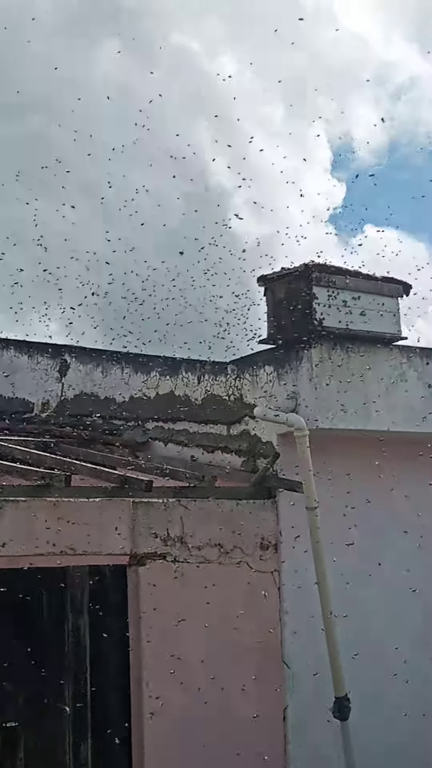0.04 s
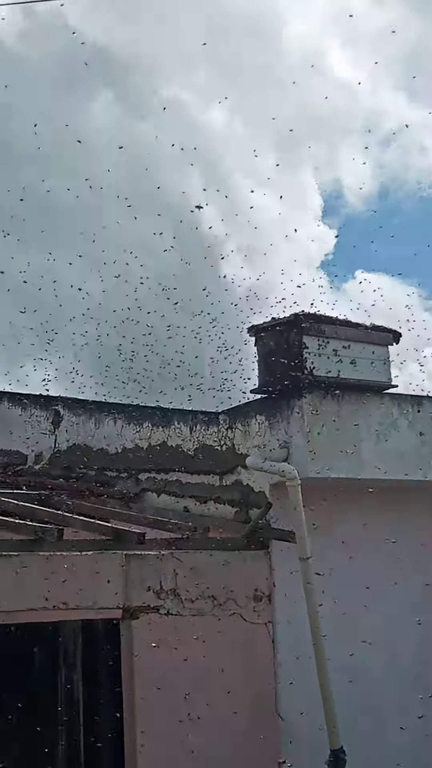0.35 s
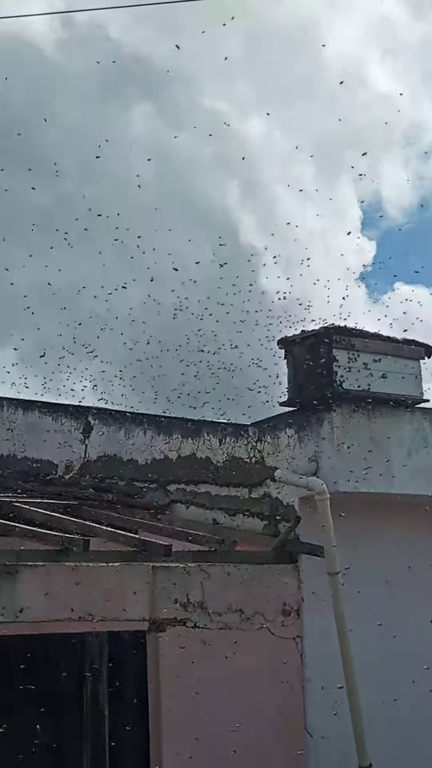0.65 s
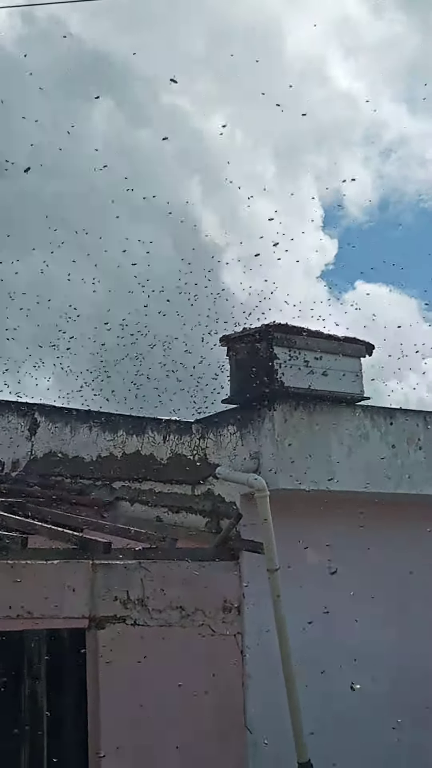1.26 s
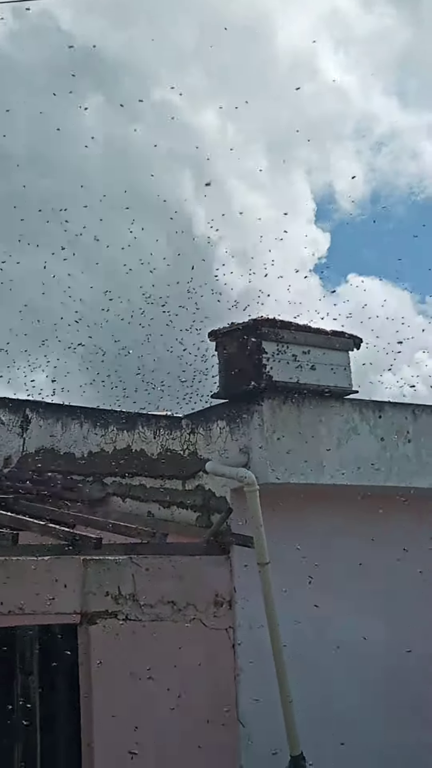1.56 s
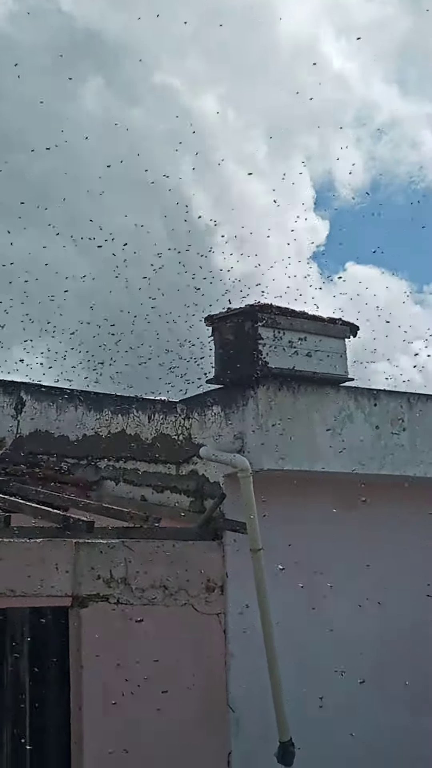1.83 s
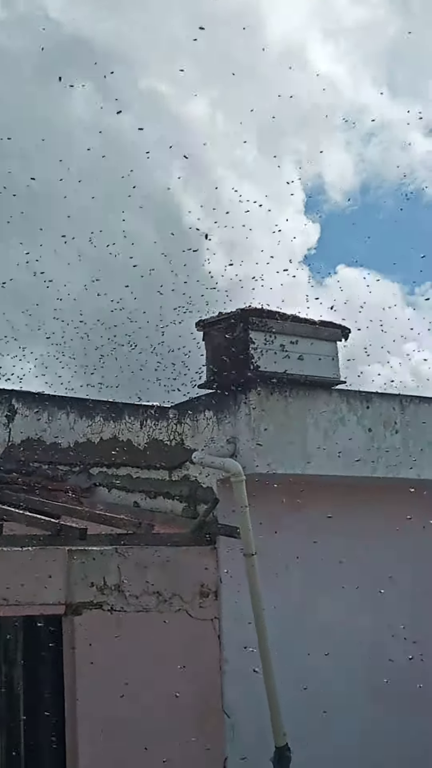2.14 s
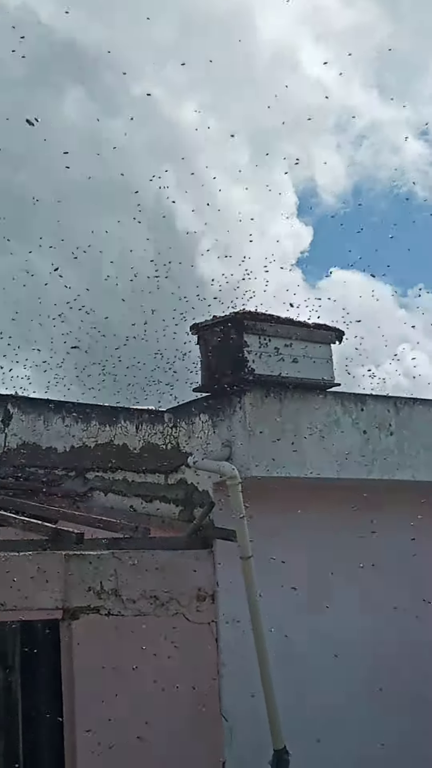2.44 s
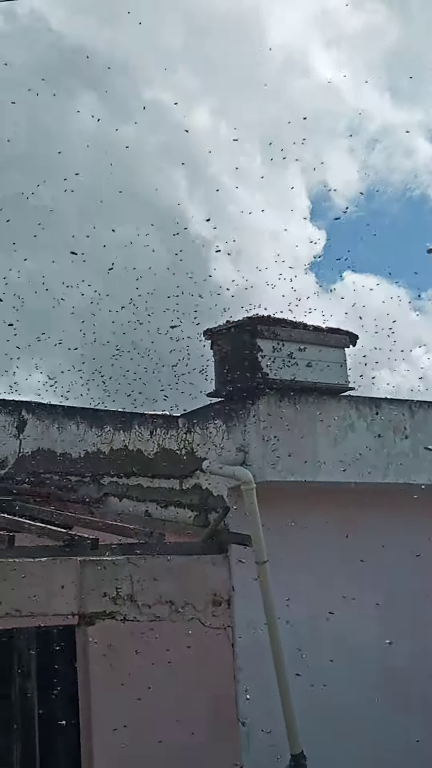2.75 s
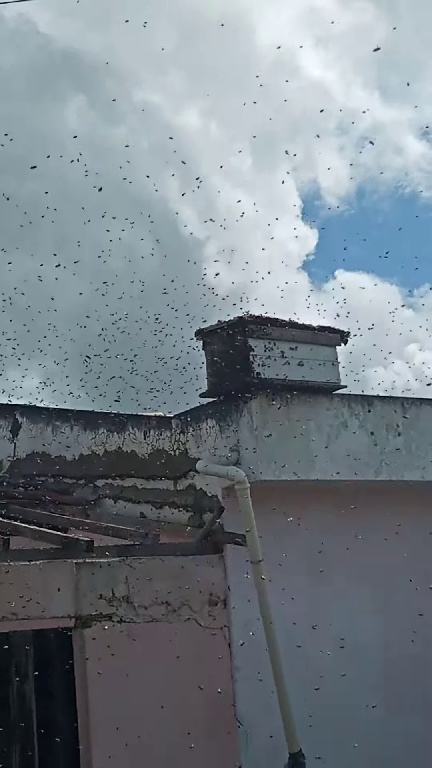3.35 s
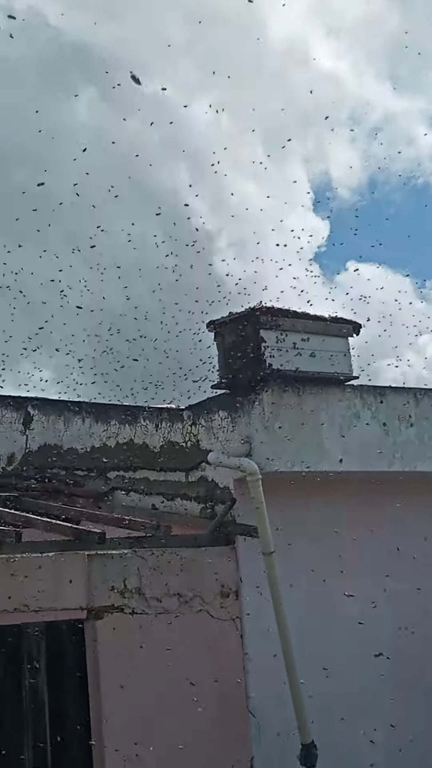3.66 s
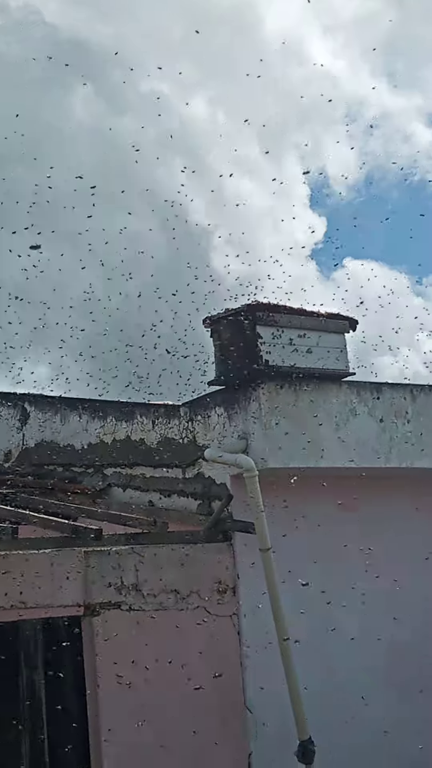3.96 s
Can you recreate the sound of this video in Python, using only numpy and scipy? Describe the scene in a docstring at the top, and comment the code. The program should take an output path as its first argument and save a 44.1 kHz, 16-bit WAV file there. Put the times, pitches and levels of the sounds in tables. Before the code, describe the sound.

A dense swarm of bees drones around a rooftop, single bees zipping close to the phone microphone. A distant dog yelps in two echoing runs, with a few finger rubs and taps over a steady hiss.

```python
"""On a rooftop, a swarm of bees circles: dozens of wingbeats, each wandering in pitch and distance,
merge into one drone, and single bees pass close. Far off, what is probably a dog yelps in two runs,
smeared by the house walls. Fingers rub and tick on a phone at the start and tap it later.
A steady high hiss lies under it all. The sound is mono."""
import sys
import numpy as np
from scipy import signal
from scipy.fft import rfft, irfft
from scipy.io import wavfile

SR = 44100
rng = np.random.default_rng(int(sys.argv[2]) if len(sys.argv) > 2 else 0)


def put_to_file(sound):
    """Save the sound as 16-bit audio at rate SR, in the file named by the first command-line argument."""
    columns = np.atleast_2d(sound).T  # one column per channel
    safe = np.clip(columns, -1, 1)
    whole_steps = np.round(safe * 32767)
    wavfile.write(sys.argv[1], SR, whole_steps.astype(np.int16))


N = 176400

WING_HZ = 230.7
def wingbeat(hz, size=2048, harmonics=36):
    """One bright wing stroke, looped at a moving rate."""
    stroke = irfft(np.r_[0, np.exp(2j * np.pi * rng.random(size=harmonics))], size)
    return stroke[(np.cumsum(hz) / SR * size).astype(int) % size]


# Tone of the drone: freq_hz, gain_db
SWARM_EQ = [(120, -41.5), (210, -14), (300, -36), (370, -10), (460, -3.5), (700, -4), (950, -5),
            (1250, 1.5), (1550, -5.5), (1850, -9.5), (2200, -21), (2800, -31.5), (4000, -27), (7000, -22),
            (12000, -40.5)]
# Fader ride on the drone: time_s, gain_db
SWARM_SWELL = [(0, 0.5), (.6, 2), (1.3, 1.5), (1.7, -0.5), (2.1, 0.5), (2.7, 2), (3.4, 1.5), (3.7, 0),
               (4, 1)]
def swarm(t, bees=28, level_db=-51, swerve_db=6):
    """Each bee drifts around its own pitch, growing louder and softer as it nears and leaves."""
    drone = np.zeros(N)
    for rank in (np.arange(bees) + .5) / bees:
        detune = np.log(rank / (1 - rank)) * np.sqrt(3) / np.pi  # bell-shaped spread
        hz = WING_HZ * (1 + .06 * detune + .06 * wander(7) + .012 * wander(25))
        drone += wingbeat(hz) * undb(swerve_db * np.clip(wander(7), -2, 2))
    swell_db = np.interp(t, *np.array(SWARM_SWELL).T)
    return unit(eq(drone, SWARM_EQ)) * undb(level_db + swell_db)


# Tone of a bee up close: freq_hz, gain_db
CLOSE_EQ = [(150, -14), (240, 3), (470, -19), (720, -21), (1000, 9.5), (1280, -11), (1700, -9), (2200, -17),
            (3000, -27.5), (8000, -25)]
# Fly-bys: closest_s, pitch_hz, level_db, pass_s (time to fly its own closest distance)
FLYBYS = [(0.018, 224.6, -53.5, 0.0095), (.22, 215, -60, 0.029), (0.365, 238.2, -57.5, 0.037),
          (0.68, 239.4, -63, 0.044), (1.159, 225, -54.5, 0.014), (1.259, 229.4, -61.5, 0.017),
          (1.481, 230.5, -56, 0.032), (1.615, 222.8, -57.5, 0.05), (1.84, 236, -58.5, 0.022),
          (2.2, 238.5, -62.5, 0.027), (2.504, 228, -62.5, .022), (2.721, 246, -54, 0.023),
          (2.981, 241.5, -55, 0.028), (3.289, 238, -56.5, 0.019), (3.636, 243.7, -61, 0.027),
          (3.859, 228.8, -58, 0.02)]
def close_bees(t, doppler=.025):
    """A passing bee swells in its near field and drops in pitch as it goes by."""
    buzz = np.zeros(N)
    flutter = .042 * wander(35)
    for closest, hz, db, pass_s in FLYBYS:
        along = (t - closest) / pass_s
        distance_squared = 1 + along ** 2
        bend = doppler * along / np.sqrt(distance_squared)
        buzz += undb(db) * wingbeat(hz * (1 + flutter - bend)) / distance_squared
    steady_bee = eq(wingbeat(np.full(N, WING_HZ)), CLOSE_EQ)
    return eq(buzz, CLOSE_EQ) / np.std(steady_bee)


# Tone of the throat rasp: freq_hz, gain_db
THROAT_EQ = [(200, -50), (340, -12.5), (440, 4.5), (520, -4.5), (640, -2.5), (900, 3.5), (1250, -5),
             (1700, -6), (2200, -22), (3500, -46.5)]
# Hoarse, toneless barks: start_s, length_s, level_db
BARKS = [(2.171, 0.082, -42.5), (3.347, 0.084, -49.5)]
# Yelps: start_s, length_s, pitch_hz, level_db, second_harmonic_db, third_harmonic_db, rasp_db
YELPS = [(-.06, 0.13, 503, -47, -7, -6, -7), (.14, 0.091, 525, -46.5, 0, -8, -10),
         (.24, 0.0795, 520.5, -46, -12, -14, -17), (.45, 0.13, 528.3, -48.5, -1, -13, -3.5),
         (0.607, 0.13, 429.5, -49.5, 6, 4.5, -6), (.71, 0.098, 519.3, -46.5, 4, -8, -12),
         (0.875, 0.13, 422.3, -49, 4.5, 5.5, -3), (.93, 0.21, 513, -49.5, -0.5, -30, -3.5),
         (1.19, 0.14, 512.6, -45.5, 3.5, -16, -6.5), (1.33, 0.073, 507, -48.5, -13, -18, -1.5),
         (2.227, 0.11, 569.5, -37.5, 0, 29, -20), (2.257, 0.125, 606.3, -36.5, -8.5, -11, -9),
         (2.478, 0.16, 567.3, -43, -3.5, -3, -7), (2.684, 0.19, 544.8, -43, -2.5, -31, -11),
         (2.961, 0.18, 553.7, -43, -2, -8, -8), (3.254, 0.16, 547.6, -41, 0, -10.5, -10.5)]
def dog(t, pitch_arch=.13):
    """Trembling, raspy yelps arch up and down in pitch; the barks are rasp alone."""
    rasp = noise(THROAT_EQ)
    jitter = 1 + .016 * wander(130)
    shimmer = 1 + .35 * wander(110)
    voice = rasp * swells(t, BARKS)
    for start, length, hz, db, second_db, third_db, rasp_db in YELPS:
        effort = arch(t, start, length)
        on = effort > 0
        pitch = hz * jitter[on] * (1 - pitch_arch * (1 - effort[on]))
        phase = 2 * np.pi * np.cumsum(pitch) / SR
        harmonics_db = {1: 0, 2: second_db, 3: third_db, 4: -36, 6: -39.5}
        tone = sum(undb(gain_db) * np.sin(k * phase) for k, gain_db in harmonics_db.items())
        yelp = unit(shimmer[on] * tone) + undb(rasp_db) * rasp[on]
        voice[on] += undb(db) * np.sqrt(effort[on]) * yelp
    return voice


def wall_echo(x, t, build_s=.011, t60_s=.57, direct_db=-1):
    """A weak direct path plus a dense echo off the walls that builds and dies away."""
    tail = rng.standard_normal(N) * (1 - np.exp(-t / build_s)) * decay(t, t60_s)
    wet = signal.fftconvolve(x, tail / np.linalg.norm(tail))[:N]
    return (wet + undb(direct_db) * x) / np.hypot(1, undb(direct_db))


# Tone of skin on the case: freq_hz, gain_db
SKIN_EQ = [(100, -40), (300, 9.5), (1000, 19.5), (2300, 6.5), (3500, 4), (5500, 10.5), (7200, 8.5),
           (9500, -1.5), (12000, 5), (15500, -1.5)]
# Finger rubs: start_s, length_s, level_db
RUBS = [(0.13, 0.12, -47), (0.223, 0.13, -51.5), (0.329, 0.057, -53), (0.429, 0.076, -47.5),
        (0.48, 0.13, -48.5), (3.93, 0.1, -58)]
def finger_rubs(t, grain=.55):
    """Skin drags over the case in short, grainy swells of noise."""
    return noise(SKIN_EQ) * unit(np.exp(grain * wander(400))) * swells(t, RUBS)


# Tone of a tick: freq_hz, gain_db
TICK_EQ = [(100, -33), (500, -11), (2000, -10), (3500, -3), (5500, 2.5), (7200, 10.5), (9500, -8.5),
           (12000, 1.5), (15500, -4)]
# Finger ticks: start_s, level_db
TICKS = [(.165, -29), (.208, -37), (.292, -25), (.3068, -18), (.3082, -20), (0.366, -27), (0.5225, -20.5),
         (0.529, -18), (0.5335, -20), (0.5675, -24.5)]
def finger_ticks(t, decay_s=.0005):
    """Fingers tick on the case: tiny, bright snaps of noise."""
    snap = np.exp(-t / decay_s)
    envelope = signal.fftconvolve(impulses(TICKS), snap / np.linalg.norm(snap))[:N]
    return eq(rng.standard_normal(N) * envelope, TICK_EQ)


# Dull tone of the phone's body: freq_hz, gain_db
BODY_EQ = [(50, -12), (130, -17), (250, 3.5), (600, -6.5), (1100, 4), (2200, 1), (3200, -9.5), (4200, -30),
           (8000, -62)]
# Ring of the case: freq_hz, gain_db, t60_s
CASE_MODES = [(2480, -4, 0.078), (2600, 1, .05), (3225, -20, 0.93), (3260, -18.5, 1), (3800, -5, .035),
              (4540, -3, 0.022)]
# Finger taps: start_s, knock_db, ring_db
TAPS = [(2.9338, -18, -51.5), (2.9866, -8.5, -55)]
# Soft hand scuffs: start_s, length_s, level_db
SCUFFS = [(0.184, 0.084, -53), (0.273, 0.054, -48), (0.79, 0.022, -57.5), (2.942, 0.083, -48.5)]
def taps_and_scuffs(t):
    """Taps knock the body and set the case ringing; the hand brushes the same body."""
    knocks = eq(impulses([(at, db) for at, db, _ in TAPS]), BODY_EQ)
    modes = sum(undb(db) * np.sin(2 * np.pi * hz * t) * decay(t, t60) for hz, db, t60 in CASE_MODES)
    ring = signal.fftconvolve(impulses([(at, db) for at, _, db in TAPS]), modes)[:N]
    return knocks + ring + noise(BODY_EQ) * swells(t, SCUFFS)


# Tone of the hiss: freq_hz, gain_db
HISS_EQ = [(30, 5), (70, -27), (130, -13.5), (400, 3.5), (2800, -32), (4100, -13), (4900, -1), (5700, 2),
           (6300, -2), (7100, 1.5), (8300, -9), (9700, -14), (11700, -6), (13000, -7), (15500, -2.5)]
def hiss(level_db=-57):
    """A steady bed of airy noise."""
    return undb(level_db) * noise(HISS_EQ)


def undb(db):
    """Decibels to gain."""
    return 10 ** (np.asarray(db) / 20)


def unit(x):
    """Scale to an rms of 1."""
    return x / np.sqrt(np.mean(x ** 2) + 1e-20)


def eq(x, curve):
    """Minimum-phase EQ through (freq_hz, gain_db) points."""
    hz, db = np.array(curve, float).T
    bins_hz = np.arange(N + 1) * SR / (2 * N)
    log_gain = np.log(undb(np.interp(np.log(bins_hz + 1), np.log(hz), db)))
    cepstrum = irfft(log_gain)
    cepstrum[1:N] *= 2
    cepstrum[N + 1:] = 0
    return irfft(rfft(x, 2 * N) * np.exp(rfft(cepstrum)))[:N]


def noise(curve):
    """EQ-shaped noise with an rms of 1."""
    return unit(eq(rng.standard_normal(N), curve))


def wander(rate_hz):
    """Smooth random drift with a spread near 1."""
    knots = rng.standard_normal(2048)
    at = np.arange(N) * (rate_hz / SR) + rng.random()
    k = at.astype(int)
    part = at - k
    return knots[k] + np.diff(knots)[k] * part * part * (3 - 2 * part)


def decay(t, t60_s):
    """A fade of 60 dB every t60_s."""
    return np.exp(-np.log(1000) * t / t60_s)


def arch(t, start, length):
    """A rounded rise and fall."""
    progress = np.clip((t - start) / length, 0, 1)
    return 4 * progress * (1 - progress)


def swells(t, rows):
    """One arch per (start_s, length_s, level_db) row."""
    return sum(undb(db) * arch(t, start, length) for start, length, db in rows)


def impulses(rows):
    """One impulse per (start_s, level_db) row."""
    hits = np.zeros(N)
    for at, db in rows:
        hits[int(at * SR)] = undb(db)
    return hits


def scene():
    """Bees, far dog, handling and hiss, alike in both channels."""
    t = np.arange(N) / SR
    bees = swarm(t) + close_bees(t)
    far_dog = wall_echo(dog(t), t)
    handling = finger_rubs(t) + finger_ticks(t) + taps_and_scuffs(t)
    mono = bees + far_dog + handling + hiss()
    return np.array([mono, mono])


def record(dry):
    """The phone rolls off the bass and cuts the very top steeply."""
    low_cut = signal.butter(2, 134, "high", fs=SR, output="sos")
    high_cut = signal.ellip(10, .2, 70, 15900, fs=SR, output="sos")
    return signal.sosfilt(high_cut, signal.sosfilt(low_cut, dry))


dry = scene()
out = record(dry)
put_to_file(out)
```